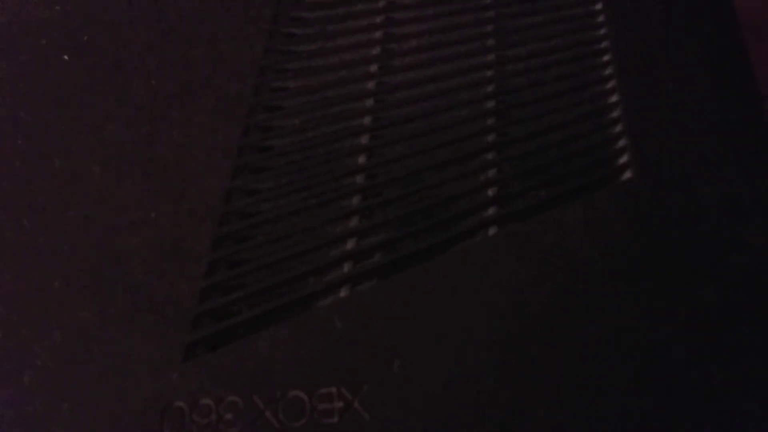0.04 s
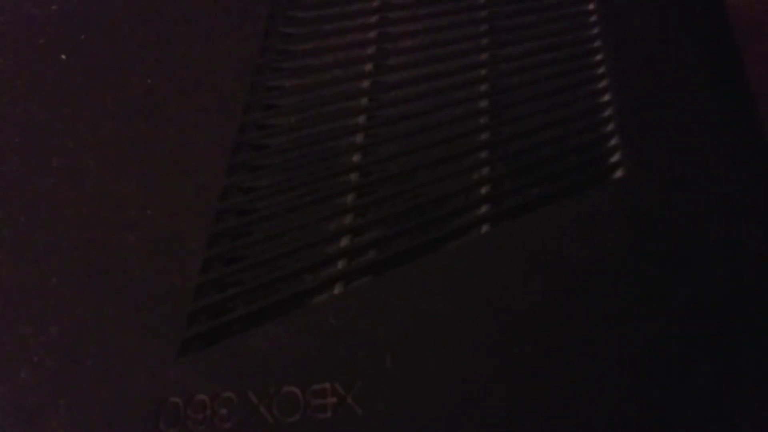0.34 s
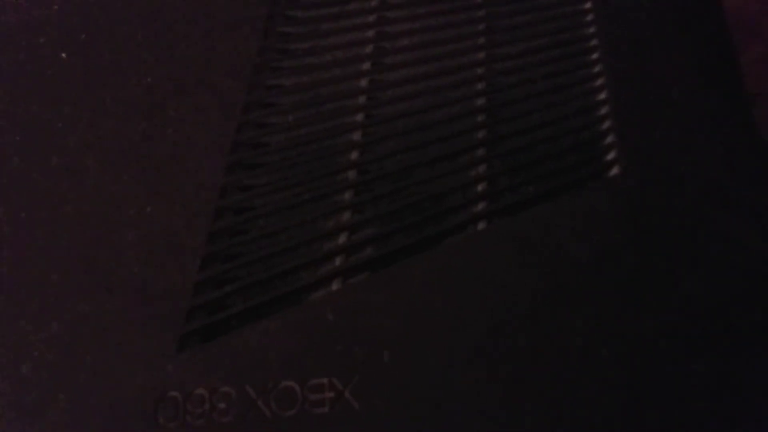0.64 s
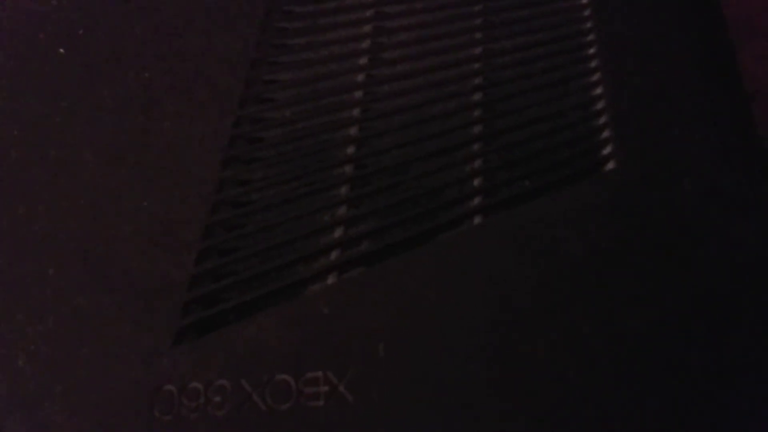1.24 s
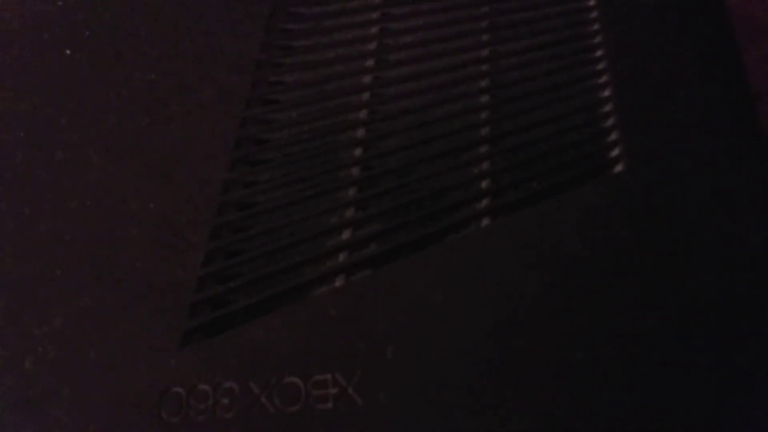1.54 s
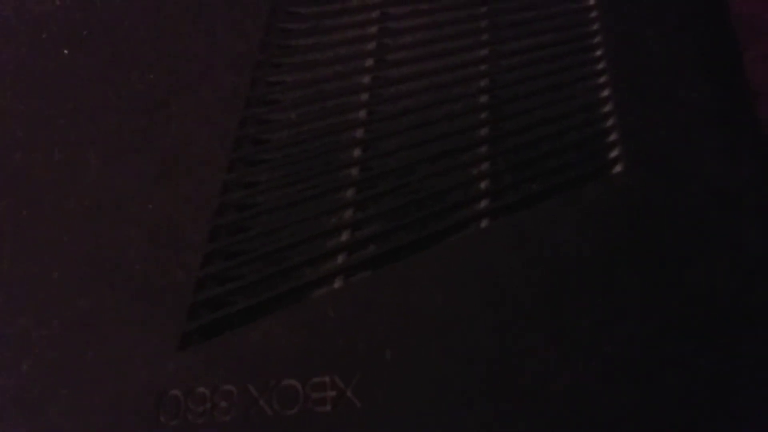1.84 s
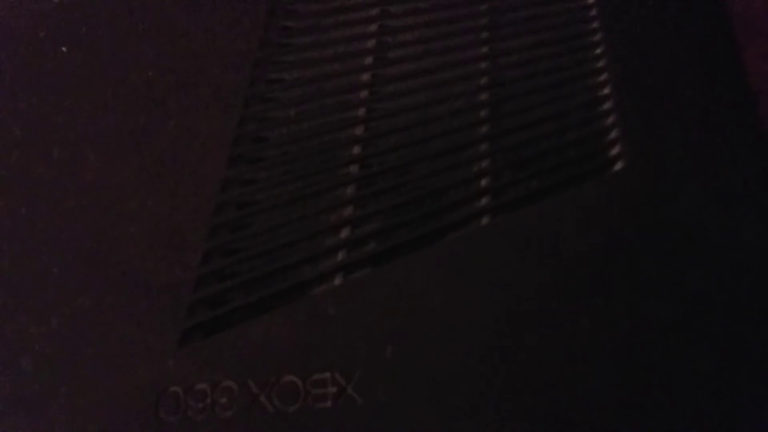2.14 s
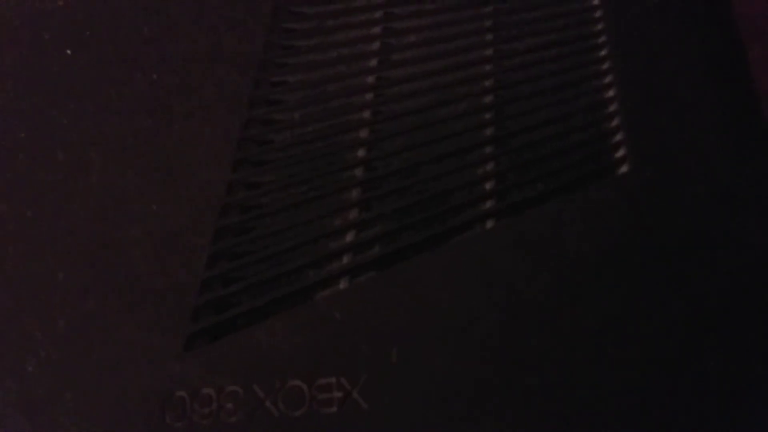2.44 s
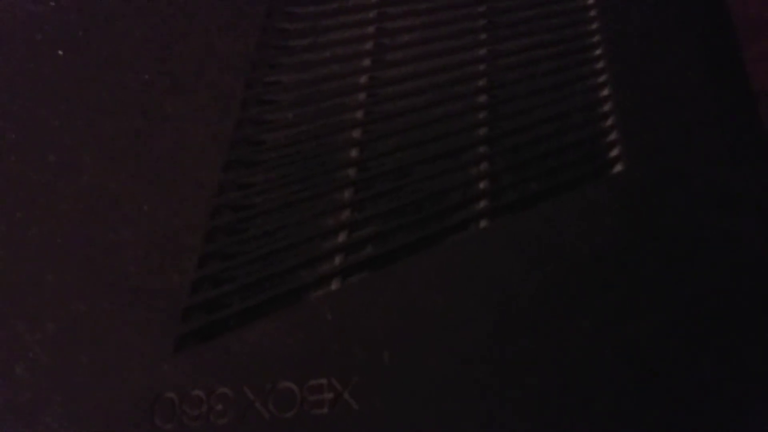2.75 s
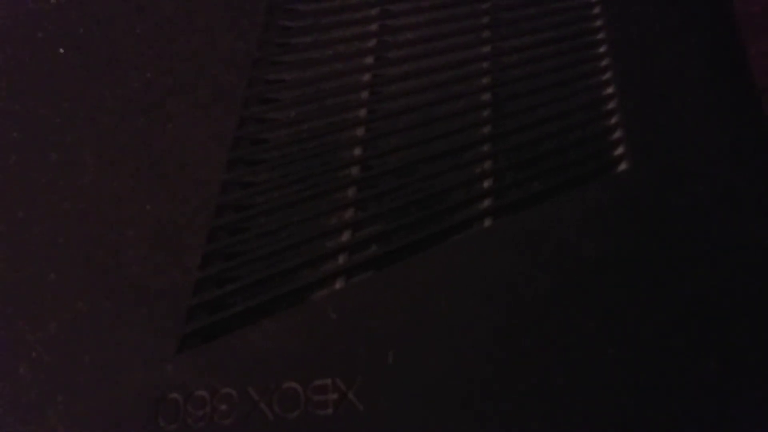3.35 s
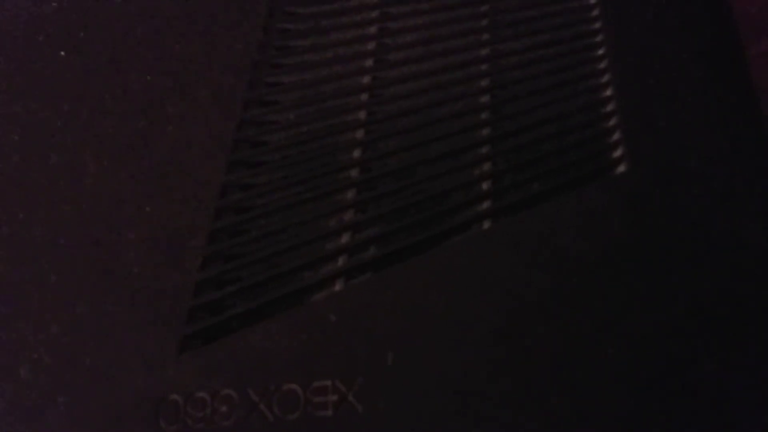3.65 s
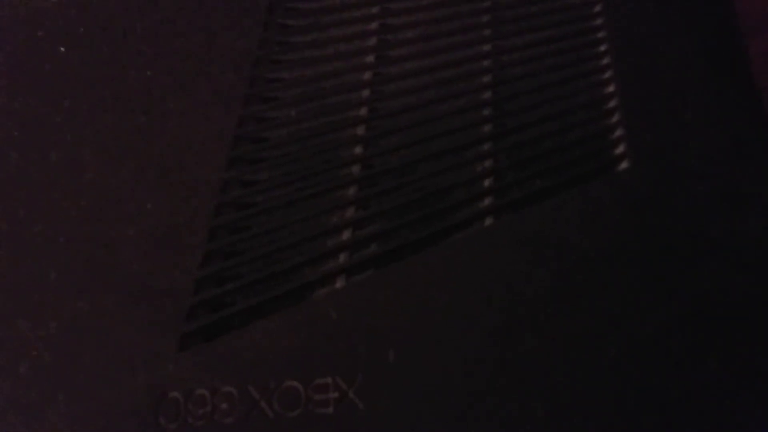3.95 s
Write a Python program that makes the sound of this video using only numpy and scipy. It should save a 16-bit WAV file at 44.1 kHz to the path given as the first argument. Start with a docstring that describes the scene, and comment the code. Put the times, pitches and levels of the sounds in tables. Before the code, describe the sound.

Close to a game console, a disc grinds harshly in its drive, stopping and starting, buzzing against the plastic and sometimes ringing. The bursts run almost together midway, then break up again, while a steady fan hiss fills the gaps.

```python
"""A disc scraping in a game console

A spinning disc keeps scraping against its tray. Each scrape is a run of tiny impacts in the plastic
housing. At times friction makes the disc itself ring. Pressed harder, its rim knocks once per turn,
so fast that it buzzes. Cooling fans hiss and whine steadily underneath; the recorder's noise
suppressor lets more of them through just after each scrape begins."""
import sys
import numpy as np
from scipy import signal
from scipy.fft import rfft, irfft, next_fast_len
from scipy.io import wavfile
from scipy.ndimage import uniform_filter1d

SR = 44100
rng = np.random.default_rng(int(sys.argv[2]) if len(sys.argv) > 2 else 0)


def to_wav(sig):
    """Store sig (one row per channel, or 1-D mono) as 16-bit WAV at the path in sys.argv[1].

    Samples outside -1..1 are clipped; the rate is SR.
    """
    pcm = np.clip(np.atleast_2d(sig), -1, 1) * 32767
    pcm = np.round(pcm).astype(np.int16)
    wavfile.write(sys.argv[1], SR, pcm.T)  # frames by channels


N = 176400
TIME = np.arange(N) / SR
SPIN_HZ = 106.8  # turns of the disc per second


def from_db(db):
    """Turn decibels into a number to multiply by."""
    return 10 ** (np.asarray(db) / 20)


def unit_level(x):
    """Scale a signal so that its average (RMS) level is 1."""
    return x / np.sqrt(np.mean(x ** 2) + 1e-20)


def drift(rate_hz):
    """A smooth random wobble of typical size 1, mostly slower than rate_hz."""
    hz = np.arange(N // 2 + 1) * SR / N
    return unit_level(irfft(rfft(rng.standard_normal(N)) / (1 + (hz / rate_hz) ** 2), N))


def envelope(rows, attack_s=.0025, release_s=.009):
    """Loudness over time: each row rises, holds and dies away, and the loudest one wins."""
    loudness = 0
    for start, end, db in rows:
        rise = 1 - np.exp(-np.clip(TIME - start, 0, None) / attack_s)
        fall = np.exp(-np.clip((TIME - end) / release_s, 0, 20))
        loudness = np.maximum(loudness, from_db(db) * rise * fall)
    return loudness


def colour(x, curve):
    """Make each frequency louder or softer, following a curve of f/Hz, level/dB points."""
    size = next_fast_len(N + SR // 4)
    size += size % 2
    hz, db = np.transpose(curve)
    grid_hz = np.maximum(np.arange(size // 2 + 1) * SR / size, 1)
    gain = from_db(np.interp(np.log(grid_hz), np.log(hz), db))
    cepstrum = irfft(np.log(gain))
    # fold the second half onto the first, so no sound comes before its cause
    cepstrum[1:size // 2] *= 2
    cepstrum[size // 2 + 1:] = 0
    return irfft(rfft(x, size) * np.exp(rfft(cepstrum)))[:N]


# Pitches at which the tray and housing ring: f/Hz, width/Hz, full boost/dB
RESONANCES = [(408.4, 8.6, 14.5), (542, 80, 6), (669, 34, 5.5), (767, 10, 3.5), (829, 41, 4.5),
              (995, 11.5, 7), (1086, 15.4, 12), (1153, 20, 11), (1297, 44, 4), (1510, 16, 9.5),
              (1584, 16, 6), (1662, 23, 8), (1732, 24, 7.5), (1889, 28, 7), (1979, 57, 5.5), (2677, 49, 9),
              (2730, 26, 5), (2873, 35, 4.5)]
def housing(x, share):
    """The housing lifts the sound at each of its own pitches, by a share of the full boost."""
    for hz, width, db in RESONANCES:
        r = np.exp(-np.pi * width / SR)
        feedback = [1, -2 * r * np.cos(2 * np.pi * hz / SR), r * r]
        band = signal.lfilter(np.array([1, 0, -1]) * (1 - r * r) / 2, feedback, x)
        x = x + (from_db(share * db) - 1) * band
    return x


def strike_housing(force, curve):
    """Every hit makes a click, coloured by the curve, that sets the housing ringing."""
    click = colour(signal.unit_impulse(N), curve)[:SR // 4]
    response = housing(click, share=.98)
    return signal.fftconvolve(force, response / np.linalg.norm(response))[:N]


# When the disc scrapes: start t/s, end t/s, relative level/dB
SCRAPES = [(0.0, .025, -45.5), (.245, .275, -55), (.284, .303, -43.5), (.303, .405, -43),
           (.405, .43, -47.5), (.43, .55, -41.5), (.55, .672, -43), (.698, .765, -42), (.883, .896, -48),
           (.964, .997, -47), (1.0, 1.21, -42.5), (1.21, 1.26, -43.5), (1.26, 1.345, -41.5),
           (1.42, 1.44, -44), (1.446, 1.69, -41), (1.69, 1.735, -49.5), (1.735, 1.94, -42.5),
           (1.94, 2.125, -41.5), (2.125, 2.175, -43.5), (2.18, 2.49, -41), (2.49, 2.565, -43),
           (2.57, 2.607, -45), (2.843, 2.872, -47.5), (2.872, 2.908, -47), (2.975, 3.02, -45.5),
           (3.018, 3.175, -41.5), (3.44, 3.465, -51.5), (3.505, 3.56, -42.5), (3.56, 3.598, -40),
           (3.618, 3.85, -41), (3.85, 3.91, -44), (3.912, 3.935, -49)]
# The tone of one tiny, dry impact: f/Hz, relative level/dB
TICK_TONE = [(90, -56.5), (330, -19.5), (450, -11), (610, -0.5), (850, 0), (1130, -6), (1240, -6),
             (1400, -10.5), (1600, -2.5), (1970, -3), (2130, -14.5), (2550, -9), (2760, -6.5), (3000, -7.5),
             (3170, -22), (4500, -33), (10800, -46), (11850, -29), (12900, -44), (15000, -55)]
def scraping(hits_per_s=2000, spread_db=2.0, bunching=.6):
    """The disc rubs the tray in many tiny impacts that bunch up once per turn."""
    density = 1 + bunching * np.cos(2 * np.pi * SPIN_HZ * TIME + drift(4))
    hits = rng.random(N) < hits_per_s * density / SR
    force = hits * from_db(spread_db * rng.standard_normal(N)) * rng.choice([-1, 1], N)
    force /= np.sqrt(uniform_filter1d(force ** 2, size=1200) + 1e-9)  # even out the level
    return strike_housing(force * envelope(SCRAPES), TICK_TONE)


# When the disc rings: start t/s, end t/s, relative level/dB
RINGS = [(0.0, .025, -46), (.31, .4, -48.5), (.45, .48, -47), (.54, .605, -43.5), (.705, .755, -49),
         (1.04, 1.105, -44.5), (1.145, 1.215, -42.5), (1.28, 1.33, -46.5), (1.48, 1.69, -48.5),
         (1.79, 1.85, -45.5), (1.93, 1.98, -47.5), (2.075, 2.11, -49.5), (2.18, 2.43, -48.5),
         (2.53, 2.61, -45.5), (2.848, 2.92, -52.5), (2.985, 3.04, -52.5), (3.06, 3.12, -48.5),
         (3.12, 3.165, -43), (3.54, 3.73, -52), (3.77, 3.85, -43), (3.88, 3.935, -48)]
def ringing(pitch_hz=605, wander_hz=5, flutter_db=.1):
    """Friction keeps the disc bending back and forth, which gives one unsteady note."""
    phase = 2 * np.pi * np.cumsum(pitch_hz + wander_hz * drift(37.6)) / SR
    loudness = envelope(RINGS, attack_s=.0012) * from_db(flutter_db * drift(38))
    return np.sqrt(2) * np.sin(phase) * loudness


# The tone of the rushing air: f/Hz, relative level/dB
AIR_TONE = [(25, -34), (100, -27), (170, -20), (300, -8.5), (450, -5), (600, -0.5), (900, 0), (1100, -2.5),
            (1260, -3.5), (1550, -1.5), (2200, -6), (2900, -12), (3550, -12.5), (4000, -6), (4400, -13.5),
            (4900, -8.5), (5450, -16), (5950, -9), (6500, -17.5), (9100, -18.5), (10300, -23.5),
            (11200, -21.5), (11750, -22.5), (12700, -24.5), (15800, -27)]
# Thin notes from the motor and fans: f/Hz, relative level/dB
WHINES = [(215, -84.5), (1513, -74.5), (1665, -77), (3758, -88), (5739, -88), (6067, -92), (11698, -85.5)]
def fans(air_db=-56, flicker_db=.79, wander_hz=5.88):
    """Air hisses steadily through the housing while the motors whine."""
    air_gain = from_db(air_db + flicker_db * drift(30))
    air = housing(colour(rng.standard_normal(N), AIR_TONE), share=.65)
    hiss = air_gain * unit_level(air)
    whine = 0
    for hz, db in WHINES:
        phase = 2 * np.pi * np.cumsum(hz + wander_hz * drift(14.2)) / SR
        whine += from_db(db) * np.sqrt(2) * np.sin(phase)
    return hiss + whine


def noise_suppressor(background, open_db=4, lag_s=.041):
    """The recorder lets more background through just after each listed scrape begins."""
    target = np.minimum(envelope(SCRAPES) / from_db(-47), 1)  # 1 = fully open
    smoothing = np.exp(-1 / (lag_s * SR))
    opening = signal.lfilter([1 - smoothing], [1, -smoothing], target)
    return background * from_db(open_db * opening)


# When the rim keeps knocking: start t/s, end t/s, relative level/dB
KNOCK_RUNS = [(.2935, 0.404, -47.5), (0.435, .478, -45.5), (.4842, .535, -41.5), (0.557, 0.573, -46),
              (.635, 0.671, -44.5), (0.7015, .716, -44), (0.757, 0.763, -48), (0.886, .893, -52),
              (0.997, 1.08, -47), (1.102, 1.188, -42.5), (1.274, 1.278, -40.5), (1.3279, 1.341, -44),
              (1.449, 1.463, -41.5), (1.477, 1.585, -45), (1.601, 1.666, -41.5), (1.734, 1.767, -44),
              (1.811, 1.93, -46.5), (1.943, 2.027, -42.5), (2.0354, 2.086, -40), (2.0984, 2.112, -41.5),
              (2.204, 2.288, -44), (2.394, 2.477, -42), (2.576, 2.6, -40), (3.031, 3.11, -43),
              (3.164, 3.179, -48), (3.554, 3.598, -48), (3.62, 3.69, -48), (3.704, 3.771, -43),
              (3.797, 3.85, -42), (3.9144, 3.929, -41.5)]
# The tone of one crack of the rim on the tray: f/Hz, relative level/dB
CRACK_TONE = [(105, -68.5), (380, -15.5), (800, -3.5), (1300, -11.5), (1850, 2.5), (2200, -17), (2570, -6),
              (2730, 5), (2960, 1.5), (3170, -8), (4000, -21), (6000, -34), (15000, -50)]
def knocking(speed_spread=.008, jitter_s=.00009, spread_db=1.5, bounce_s=.000984, bounce_db=-7):
    """The rim hits the tray once per turn, and a small bounce follows each knock."""
    force = np.zeros(N + SR)
    for start, end, db in KNOCK_RUNS:
        spin_hz = SPIN_HZ * (1 + speed_spread * rng.standard_normal())  # each run has its own speed
        turns = np.arange(start, end, 1 / spin_hz)
        jitter, strength, bounce = rng.standard_normal((64, 3))[:len(turns)].T
        knock_times = turns + jitter_s * jitter
        bounce_times = knock_times + bounce_s * np.exp(.3 * bounce)
        gain = from_db(db + spread_db * strength) * np.sqrt(SR / SPIN_HZ)
        force[(knock_times * SR).astype(int)] -= gain
        force[(bounce_times * SR).astype(int)] -= gain * from_db(bounce_db)
    return strike_housing(force[:N], CRACK_TONE)


def reflections(x, fade_s=.28):
    """Echoes from the case and nearby surfaces blur into a tail that drops 60 dB in fade_s."""
    t = TIME[:SR // 2]
    tail = rng.standard_normal(len(t)) * 1000 ** (-t / fade_s)
    return signal.fftconvolve(x, tail / np.linalg.norm(tail))[:N]


def scene():
    """Mix scrapes and knocks, their echoes, the ringing disc and the fans into one channel."""
    grinding = from_db(-1.5) * scraping() + from_db(-3) * knocking()
    echoes = from_db(-15) * reflections(grinding)
    return (grinding + echoes + from_db(-.5) * ringing() + noise_suppressor(fans()))[None]


def record(dry, cutoff_hz=15750):
    """Cut away the very highest treble steeply."""
    return signal.sosfilt(signal.ellip(12, .1, 80, cutoff_hz, fs=SR, output="sos"), dry)


dry = scene()
out = record(dry)
to_wav(out)
```